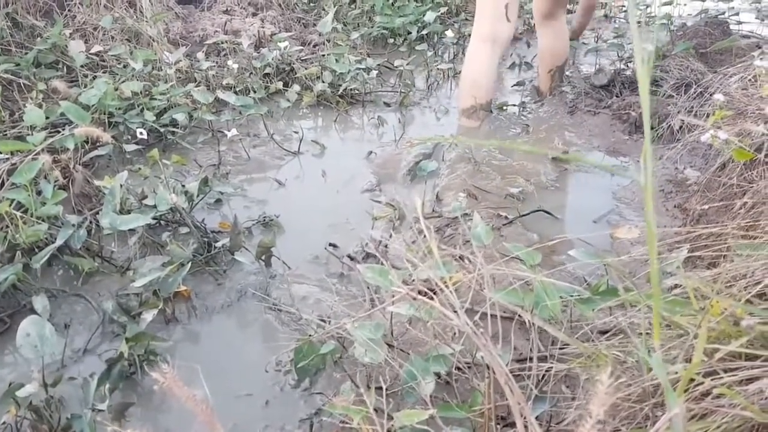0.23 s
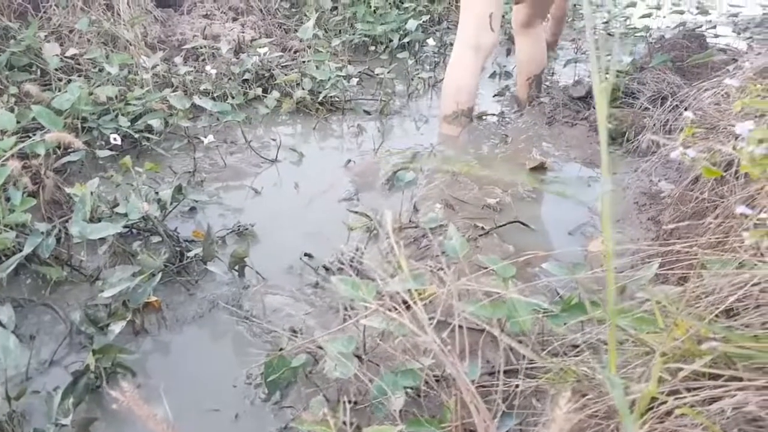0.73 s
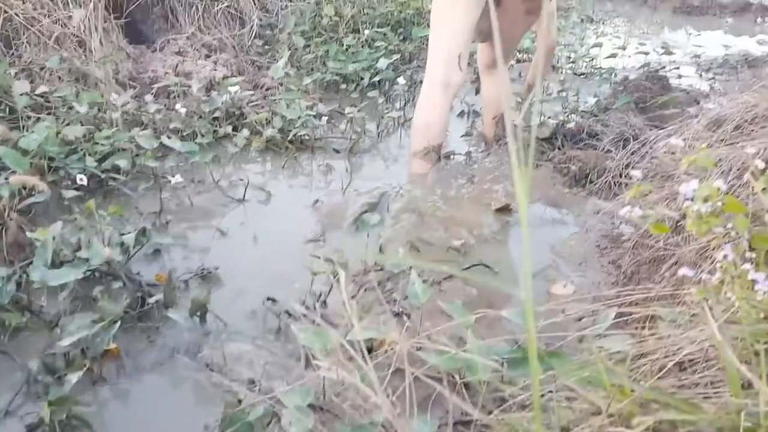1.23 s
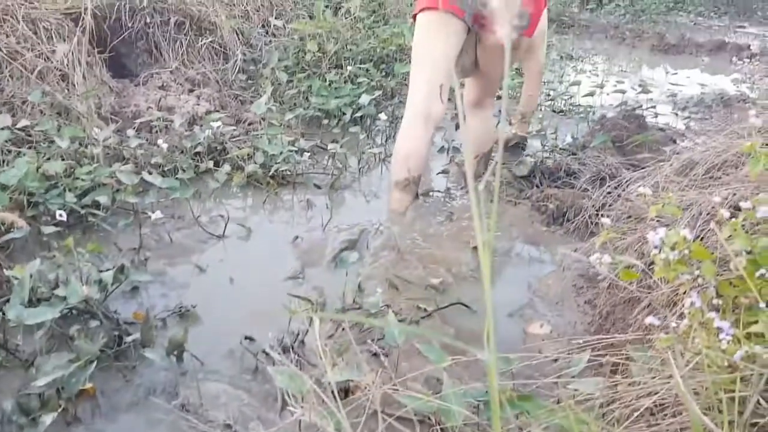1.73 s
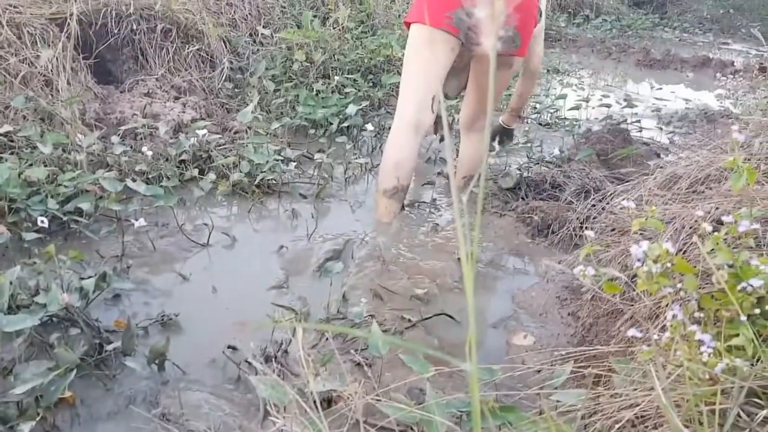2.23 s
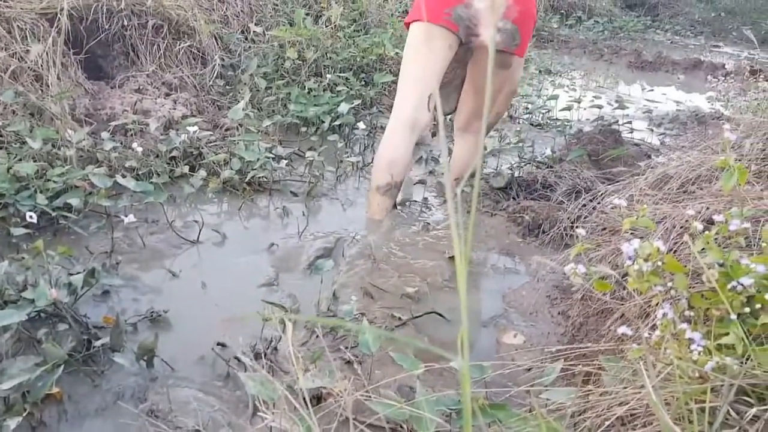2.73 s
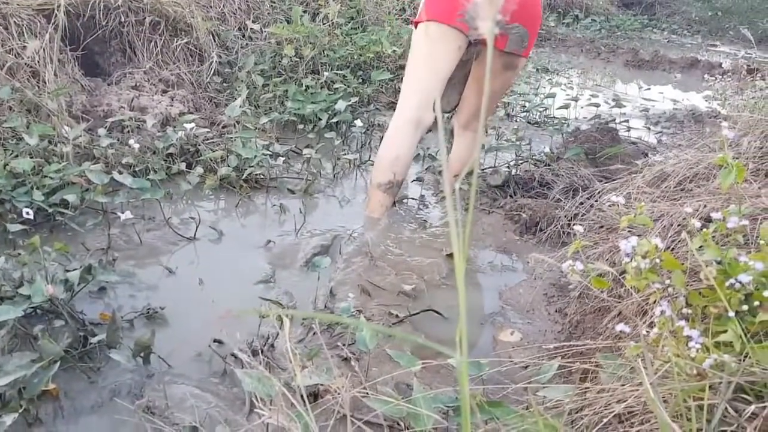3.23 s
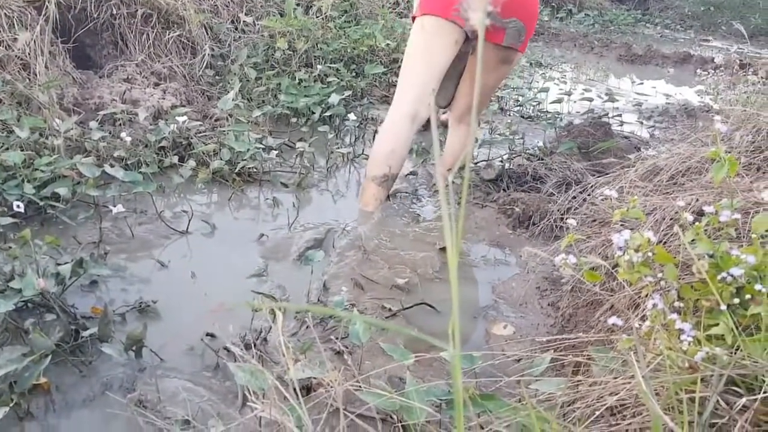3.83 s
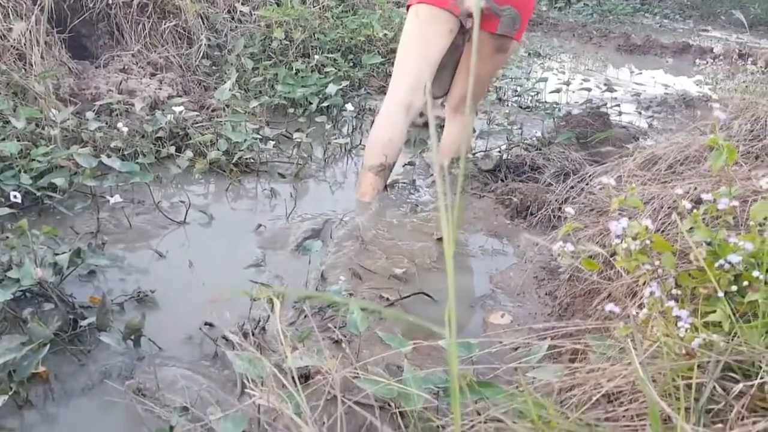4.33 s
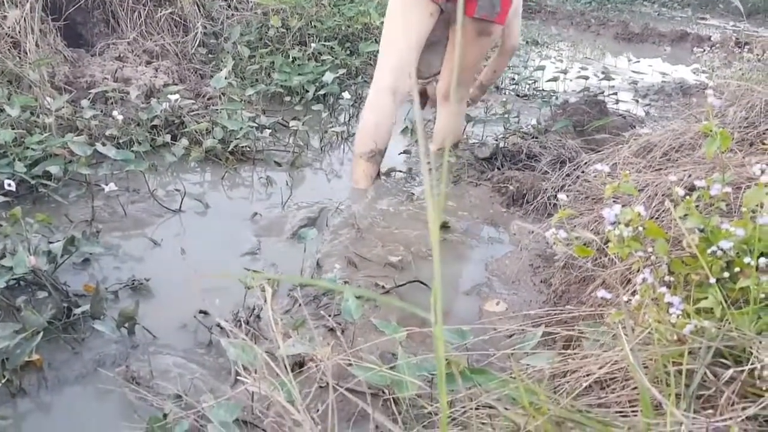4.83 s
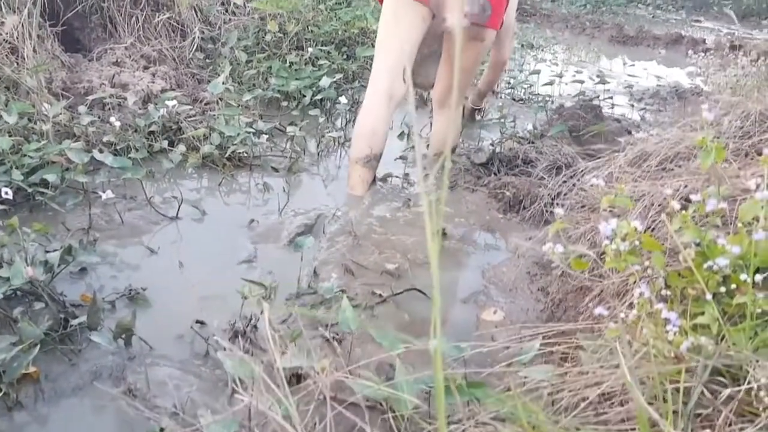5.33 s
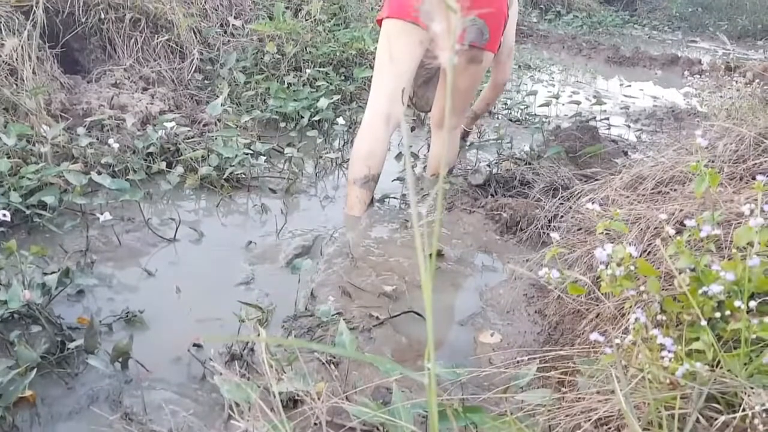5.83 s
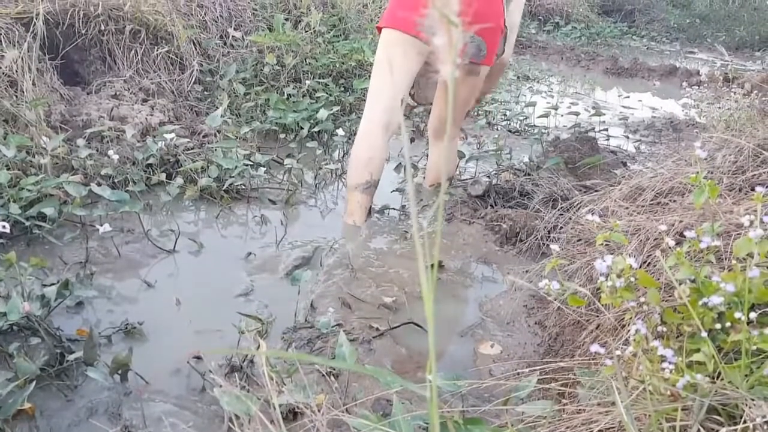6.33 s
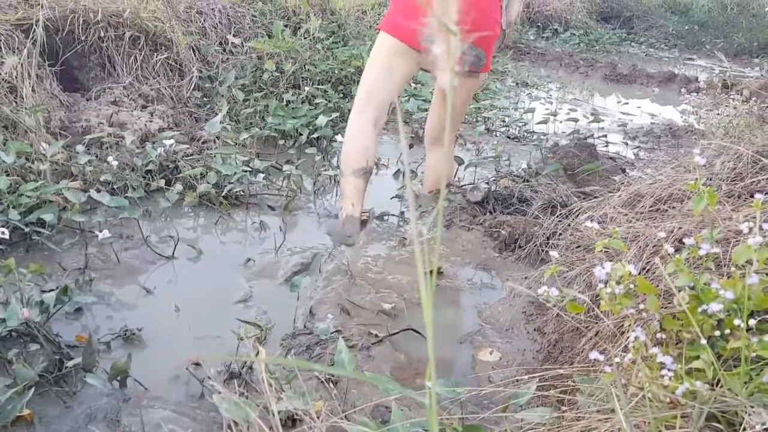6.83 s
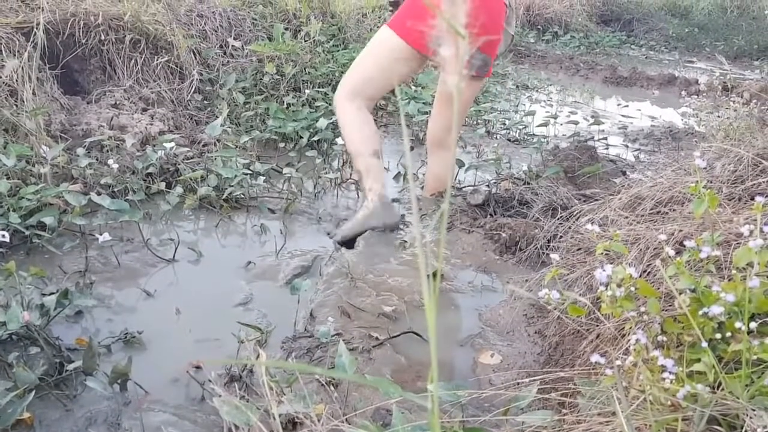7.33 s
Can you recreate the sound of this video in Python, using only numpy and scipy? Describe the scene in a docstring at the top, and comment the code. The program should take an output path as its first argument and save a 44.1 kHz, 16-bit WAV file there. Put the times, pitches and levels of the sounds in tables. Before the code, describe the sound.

Bare feet squelch and plop in shallow muddy water in sparse bursts, while crickets trill over a low distant engine drone outdoors.

```python
"""Mud smacks, trapped air plops, and water sloshes and spatters as someone wades barefoot in a shallow pool.
Three kinds of cricket sing in the grass over a far engine's drone; a light breeze brushes the right microphone.
Water sounds are built from rising bubble notes, smacks from brief rasping rings, and crickets from short
sagging tones; the engine is a wavering note with overtones, and rumble, air and breeze are coloured noise."""
import sys
import numpy as np
from scipy import signal
from scipy.fft import rfft, irfft
from scipy.io import wavfile

SR = 44100
rng = np.random.default_rng(int(sys.argv[2]) if len(sys.argv) > 2 else 0)


def unload_wav(signal):
    """Save mono or channel-first audio to the path in sys.argv[1] as 16-bit WAV at rate SR, clipped to [-1, 1]."""
    wavfile.write(
        sys.argv[1],
        SR,
        np.round(np.clip(np.atleast_2d(signal).T, -1, 1) * 32767).astype(np.int16),
    )


N = 335160
TIME = np.arange(N) / SR
EDGE_HZ = 15750  # upper edge of the whole sound


def gain_of(db):
    """Decibels to amplitude."""
    return 10 ** (np.asarray(db) / 20)


def evened(x):
    """Scales to an rms of one."""
    return x / np.sqrt(np.mean(x ** 2) + 1e-20)


def level(curve):
    """Gain at every sample from rows of (t/s, level/dB)."""
    return gain_of(np.interp(TIME, *np.transpose(curve)))


def read(points, hz):
    """Joins (f/Hz, value) points on a log-frequency axis."""
    f, value = np.transpose(points)
    return np.interp(np.log(hz + 1), np.log(f + 1), value)


def coloured(x, spectrum, power=1):
    """Filters by a (f/Hz, level/dB) spectrum, its decibels multiplied by power."""
    gain = gain_of(power * read(spectrum, np.fft.rfftfreq(N, 1 / SR)))
    return irfft(rfft(x) * gain, N)


def wander(per_s):
    """Slow random drift of unit rms: noise under a Gaussian low-pass."""
    lowpass = np.exp(-(np.fft.rfftfreq(N, 1 / SR) / per_s) ** 2)
    return evened(irfft(rfft(rng.standard_normal(N)) * lowpass, N))


def noise_pair(spectrum, likeness):
    """Coloured noise at both microphones; likeness is the share of power they have in common."""
    shared, *own = rng.standard_normal((3, N))
    pair = np.sqrt(likeness) * shared + np.sqrt(1 - likeness) * np.array(own)
    return evened(coloured(pair, spectrum))


def panned(x, left_db):
    """Makes the left louder than the right by left_db."""
    return x * gain_of([[left_db / 2], [-left_db / 2]])


def add(mix, s, sound):
    """Mixes a sound in at time s, cut off at either end of the scene."""
    start = round(s * SR)
    sound = sound[max(-start, 0):]
    part = mix[max(start, 0):][:len(sound)]
    part += sound[:len(part)]


def outdoors(x, wet_db, t60):
    """Direct sound plus a short scatter off banks and plants, different at each microphone."""
    t = np.arange(SR // 3) / SR
    tail = rng.standard_normal((2, len(t))) * gain_of(-60 * t / t60)
    tail *= t > .0015  # the scatter arrives after the direct sound
    tail /= np.linalg.norm(tail, axis=1, keepdims=True)
    return x + gain_of(wet_db) * signal.fftconvolve(x[None], tail, axes=1)[:, :N]


def ring(hz, t60, octaves_per_s, onset_cycles):
    """A bubble's dying note; it starts softly and its pitch climbs as it nears the surface."""
    t = np.arange(int(np.clip(t60, .002, .2) * SR)) / SR
    pitch = np.minimum(hz * 2 ** (octaves_per_s * t), SR / 2)
    tone = np.sin(2 * np.pi * np.cumsum(pitch) / SR)
    decay = np.exp(-np.log(1000) * t / t60)
    onset = 1 - np.exp(-(t * hz / onset_cycles) ** 2)
    return tone * decay * onset


def rasp(note, hz, cycles):
    """Noise around a note's pitch that follows its loudness; more cycles make a narrower band."""
    band = np.cos(2 * np.pi * hz * np.arange(round(cycles * SR / hz)) / SR)
    noise = signal.fftconvolve(rng.standard_normal(SR // 4), band * np.hanning(len(band)), "same")
    return evened(noise[:len(note)]) * abs(signal.hilbert(note))


def swarm(rows, per_s, cycles, climb):
    """Clouds of small bubbles, each thickening to its loudest moment and thinning out again."""
    size_range_db = 14  # how far the largest bubble stands above the smallest
    out = np.zeros(N)
    for s, swell, fade, db, hz, spread in rows:
        cloud, length = np.zeros(N), swell + fade
        before = swell / length  # share of the bubbles that come before the loudest moment
        for when, size, pitch in rng.random((600, 3))[:int(24 + per_s * length)]:
            rising = when < before
            rarity = when / before if rising else (1 - when) / (1 - before)
            spans = -1.5 * np.log(rarity)  # distance from the loudest moment, in swells or fades
            delay = -swell * spans if rising else fade * spans
            f = hz * 2 ** (spread * np.sqrt(12) * (pitch - .5))  # spread: standard deviation in octaves
            weight = np.exp(-spans / 2) * gain_of(size_range_db * size ** 2) * (f / hz) ** 0.41
            if f < EDGE_HZ:
                add(cloud, s + delay, weight * ring(f, cycles / f, climb * f / cycles, 0.7))
        # equal energy for equal length, whatever the bubbles drawn
        out += gain_of(db) * cloud * np.sqrt(SR * length / 2 / (np.sum(cloud ** 2) + 1e-20))
    return out


def clouds(rows, swell_share, octaves):
    """Gives each movement of the water the same shape: a quick swell, a longer fade and one spread of pitch."""
    return [(s, swell_share * length, (1 - swell_share) * length, db, hz, octaves)
            for s, length, db, hz in rows]


def wing_stroke(hz, length, fall):
    """One sweep of a cricket's scraper along its file: a short tone that sags and fades as the wing slows."""
    u = np.linspace(0, 1, int(length * SR))
    pitch = hz * (1 - fall * (u ** 1.5 - .3))
    turns = rng.random() + np.cumsum(pitch) / SR
    return np.sin(2 * np.pi * turns) * abs(np.sin(np.pi * u ** .75))


def far_engine(hz=75.95, waver_hz=1.522, throb=0.39):
    """A wavering exhaust note with two weak overtones inside a low rumble."""
    # exhaust orders: [multiple of the main note, relative level/dB]
    exhaust_orders = [(1, 0), (1.5, -11), (2, -20)]
    # loudness of the exhaust note: [t/s, level/dB]
    drone_level = [(0, -46.5), (2.5, -47.5), (4.8, -46), (5.8, -48), (7.6, -51.5)]
    # colour of the rumble: [f/Hz, relative level/dB]
    rumble_spectrum = [(18, -52), (28, -26), (40, -5.5), (60, -2), (85, 5), (115, 2), (138, -4.5),
                       (158, -5), (205, -20.5), (258, -19.5), (310, -27), (500, -45), (900, -65.5)]
    # loudness of the rumble: [t/s, level/dB]
    rumble_level = [(0, -47), (1.2, -47), (3, -47), (5.4, -48.5), (6.2, -50.5), (7.6, -48.5)]
    turns = np.cumsum(hz + waver_hz * wander(6.97)) / SR
    note = np.zeros(N)
    for order, db in exhaust_orders:
        note += gain_of(db) * (1 + throb * wander(10)) * np.sin(2 * np.pi * order * turns)
    rumble = noise_pair(rumble_spectrum, likeness=0.95) * level(rumble_level)
    return evened(note) * level(drone_level) + rumble


def breeze(steady_db=-68, swell_share=0.5):
    """The hush of the open field, and eddies that puff mainly on the right microphone."""
    # puffs of breeze: [loudest t/s, length/s, level/dB]
    puffs = [(0.738, 0.072, -53), (.973, 0.0059, -39), (1.046, 0.0098, -41.5), (1.091, 0.085, -47.5),
             (4.141, .013, -40), (5.283, 0.086, -52), (5.372, 0.049, -43), (5.529, 0.027, -47.5)]
    # colour of the eddies: [f/Hz, relative level/dB]
    eddy_spectrum = [(60, -4), (150, 5), (270, -0.5), (380, -6), (500, -12.5), (650, -19), (900, -22),
                     (1500, -34), (4000, -49)]
    # colour of the open air: [f/Hz, relative level/dB]
    air_spectrum = [(200, 4.5), (600, -1), (900, 2.5), (1200, 2), (1600, 3), (2200, 3), (2800, -2),
                    (3800, 0.5), (4700, 4), (5600, -4), (9800, 2.5), (11500, -3.5), (15500, -6)]
    # loudness of the open air: [t/s, level/dB]
    air_level = [(0, -67), (2.2, -65.5), (3.7, -67), (5.5, -67.5), (6.7, -70), (7.6, -60.5)]
    gusts = np.zeros(N)
    for s, length, db in puffs:
        # exponential swell and fade around the loudest moment
        distance = np.maximum((s - TIME) / swell_share, (TIME - s) / (1 - swell_share))
        gusts += gain_of(db) * np.exp(-distance / length)
    steady = gain_of(steady_db + 2.66 * wander(10))
    eddies = noise_pair(eddy_spectrum, likeness=0.33) * (gusts + steady)
    sway = gain_of(.7 * wander(12))
    hush = noise_pair(air_spectrum, likeness=0.082) * level(air_level) * sway
    return hush + eddies * gain_of([[-15], [0]])


def far_insects(trill_hz=7530, trill_db=-76):
    """Many distant crickets merge into a shimmer of noise; one thin trill barely stands out of it."""
    # colour of the merged crickets: [f/Hz, relative level/dB]
    chorus_spectrum = [(5500, -46), (6500, -15.5), (7100, -4), (7450, 2), (7530, 3.5), (7620, -5),
                       (7850, 0), (8050, -12.5), (8800, -7), (9500, -16), (11500, -72)]
    # loudness of the merged crickets: [t/s, level/dB]
    chorus_level = [(0, -64.5), (2, -63.5), (4, -64), (6, -64), (7.6, -64.5)]
    shimmer = gain_of(.8 * wander(25) + 1.2 * wander(200))
    chorus = noise_pair(chorus_spectrum, likeness=0.054) * level(chorus_level) * shimmer
    trill = gain_of(trill_db) * evened(wander(33) * np.sin(2 * np.pi * trill_hz * TIME))
    return panned(chorus + trill, left_db=6.0)


def ground_cricket(hz=8550, rise_hz_per_s=7, strokes_per_s=116, first_end_s=.071):
    """High buzzes of eleven wing strokes that swell and stop short; the pitch creeps up through the scene."""
    # pace: [t/s, buzzes per s]
    buzz_rate = [(0, 7.2), (3.5, 7.2), (5.8, 8), (7.6, 7.554)]
    # loudness: [t/s, level/dB]
    buzz_level = [(0, -64.5), (2.5, -59), (3.5, -57.5), (4.4, -53), (5.4, -50.5), (7.6, -49)]
    out = np.zeros(N)
    buzzes = np.cumsum(np.interp(TIME, *np.transpose(buzz_rate))) / SR
    buzzes -= np.interp(first_end_s, TIME, buzzes)
    for end in np.interp(np.arange(buzzes[-1]), buzzes, TIME):
        # strokes are counted back from the end of the buzz
        for k, (pitch, size) in enumerate(rng.standard_normal((11, 2))):
            f = (hz + rise_hz_per_s * end) * (1 + .005 * pitch)
            stroke = wing_stroke(f, .0068, fall=.065)
            add(out, end - .0095 - k / strokes_per_s, gain_of(size - 6.2 * (k / 10) ** 2) * stroke)
    teeth = 1 + .22 * wander(900)
    left, right = outdoors(out * level(buzz_level) * teeth, wet_db=-12, t60=.06)
    return panned(np.array([np.roll(left, 1), right]), left_db=-2.5)


def answering_cricket(hz=4790, gap_s=.0378, soft_start_db=-7):
    """Longer falling wing strokes in threes, the first one soft, from deep in the grass."""
    # answers: [first stroke t/s, level within this voice/dB]
    answers = [(2.21, -59.5), (3.416, -42), (3.614, -39.5), (3.853, -39.5)]
    out = np.zeros(N)
    for s, db in answers:
        for k in range(3):
            stroke = wing_stroke(hz, 0.0226, fall=0.12)
            add(out, s + k * gap_s - .0105, gain_of(db + soft_start_db * (k == 0)) * stroke)
    rough = 0.2 * out * (1 + 0.37 * wander(450))
    return panned(outdoors(rough, wet_db=9.5, t60=0.047), left_db=1)


def field_cricket(hz=4425, fade_in_db=12, fall=.085, stroke_s=.0112, unsteady=.006):
    """Trills of double wing strokes, about 24 pairs a second; each trill starts soft and flat."""
    # trills: [first pair t/s, last pair t/s, level/dB]
    trills = [(-.077, 0.425, -54.5), (1.122, 1.62, -51), (2.344, 2.856, -50.5), (3.648, 4.327, -50.5),
              (4.895, 5.273, -58), (5.683, 6.147, -56), (7.2, 7.583, -53.5)]
    out = np.zeros(N)
    for first, last, db in trills:
        pairs = round((last - first) / .0422) + 1
        for k, s in enumerate(np.linspace(first, last, pairs)):
            shy = max(1 - k / 2, 0)  # only the first two pairs are held back
            pitch = hz * (1 - .06 * shy + unsteady * rng.standard_normal())
            for offset, length in ((-.0118, stroke_s), (.0012, 1.2 * stroke_s)):
                size, late, sag = rng.standard_normal(3)
                stroke = wing_stroke(pitch, length, fall * (1 + .15 * sag))
                add(out, s + offset + 0.00066 * late, gain_of(db - fade_in_db * shy + size) * stroke)
    # the uneven teeth of the file roughen each stroke
    left, right = outdoors(out * (1 + .24 * wander(500)), wet_db=-12, t60=.15)
    return panned(np.array([left, np.roll(right, 2)]), left_db=12.5)


def stalks(hz=6200):
    """Faint scattered ticks of wet plants and settling mud, each a very short ring."""
    # disturbed wet weeds: [from t/s, to t/s, ticks per s, level of the softest tick/dB]
    rustles = [(0, 7.6, 13, -68.5), (1.3, 2.25, 45, -55.5)]
    out = np.zeros(N)
    for start, end, per_s, db in rustles:
        for when, pitch, size in rng.random((400, 3))[:int(per_s * (end - start))]:
            f = hz * 2 ** (1.2 * (pitch - .5))
            tick = gain_of(db + 11 * size ** 2) * ring(f, 22 / f, 5, 1)
            add(out, start + when * (end - start), tick)
    return panned(outdoors(out, wet_db=1, t60=0.089), left_db=3.0)


def spatters():
    """Fine droplets and tearing mud films: dense clouds of short, high grains."""
    # spatters: [loudest t/s, length/s, level before colouring/dB, middle grain f/Hz]
    spatter_rows = [(.11, 0.053, -66.5, 2670), (.51, .06, -69, 6300), (1.09, 0.052, -69, 3350),
                    (1.79, 0.066, -72.5, 4620), (1.96, 0.039, -71, 5500), (2.06, .09, -69.5, 4030),
                    (2.725, 0.079, -62, 3970), (2.84, 0.15, -67.5, 5340), (3.37, .025, -57, 8500),
                    (3.41, 0.068, -66.5, 3380), (4.63, .12, -64.5, 3350), (7.025, 0.08, -63, 5120),
                    (7.29, 0.075, -61, 2260), (7.39, 0.24, -72, 2970), (7.48, .1, -60, 7000)]
    return swarm(clouds(spatter_rows, swell_share=.35, octaves=0.596), per_s=1100, cycles=21, climb=.2)


def water_bubbles(rows):
    """Moving water heard as clouds of bubble notes that climb as they die."""
    return swarm(clouds(rows, swell_share=.3, octaves=.3), per_s=600, cycles=31, climb=0.2)


def sloshes():
    """Water pushed by a foot or hand, full of small bubbles."""
    # sloshes: [loudest t/s, length/s, level before colouring/dB, middle bubble f/Hz]
    slosh_rows = [(1.11, 0.13, -71.5, 900), (2.06, 0.23, -78, 1460), (3.08, 0.075, -62, 1980),
                  (3.17, 0.037, -65.5, 770), (3.24, .09, -59, 1075), (4.615, .06, -62, 1574),
                  (5.9, 1, -81, 2080), (6.66, 0.057, -69, 1830), (7.01, 0.068, -63, 1100),
                  (7.148, .04, -68, 493), (7.275, 0.071, -57, 850), (7.35, 0.12, -70, 780),
                  (7.46, .16, -64.5, 2340), (7.47, 0.13, -65, 1100)]
    return water_bubbles(slosh_rows)


def plops(climb_octaves=0.4):
    """Trapped air rings at a rising pitch and breaks up into a wake of smaller bubbles."""
    # plops: [t/s, level before colouring/dB, nominal f/Hz, t60/s]
    plop_rows = [(2.778, -35.5, 920, 0.037), (2.789, -38, 1110, 0.017), (2.798, -52, 1640, 0.021),
                 (3.055, -51.5, 1710, .03), (3.079, -54, 1790, .03), (3.207, -40, 1180, 0.018),
                 (3.235, -45, 1637, 0.029), (3.31, -51.5, 955, 0.057), (4.483, -55, 2020, 0.071),
                 (4.541, -49.5, 1970, 0.029), (4.612, -33.5, 1940, 0.014), (6.986, -44, 1337, 0.039),
                 (7.044, -42.5, 1505, .045), (7.234, -43.5, 850, 0.019), (7.267, -50, 710, 0.083),
                 (7.282, -42, 840, 0.037), (7.337, -46, 738, 0.068), (7.412, -50.5, 794, 0.065),
                 (7.519, -40, 934, 0.043), (7.555, -40.5, 914, 0.044), (7.566, -41, 1120, 0.028)]
    wake_delay_s, wake_s, wake_db, wake_pitch_ratio = .012, .03, -24.5, 1.294
    wakes = [(s + wake_delay_s, wake_s, db + wake_db, hz * wake_pitch_ratio) for s, db, hz, _ in plop_rows]
    out = water_bubbles(wakes)
    for s, db, hz, t60 in plop_rows:
        note = ring(hz * .96, t60, climb_octaves / t60, 1.0)
        # thick mud makes the note of an air pocket unsteady
        add(out, s, gain_of(db) * (note + .17 * rasp(note, hz, cycles=3)))
    return out


def smacks(t60=0.01, overtone_ratio=2.2, overtone_db=-14.5):
    """Wet mud snaps apart: a bursting film rings briefly with one overtone, tears with a rasp and throws spray."""
    # smacks: [t/s, relative level/dB, starting f/Hz, spray level before colouring/dB]
    smack_rows = [(.506, -42.5, 6040, -64), (2.055, -41.5, 3580, -77), (2.687, -47, 3340, -53.5),
                  (2.709, -40, 7700, -53), (2.724, -29, 3600, -69), (2.957, -49, 4560, -66),
                  (3.207, -44, 5240, -55.5), (3.36, -33.5, 3090, -50), (3.382, -37, 3350, -61),
                  (4.604, -28.5, 2980, -54), (4.671, -44, 3180, -61.5), (5.663, -50, 5730, -80),
                  (7.023, -44, 6200, -66), (7.061, -56, 5400, -70), (7.136, -39, 4970, -67),
                  (7.277, -34, 1850, -74), (7.448, -44, 4480, -64), (7.511, -44, 5100, -58),
                  (7.571, -30.5, 4130, -54.5)]
    spray_hz, spray_octaves, swell_s, fade_s = 7100, 0.81, .003, .011
    sprays = [(s + swell_s, swell_s, fade_s, db, spray_hz, spray_octaves) for s, _, _, db in smack_rows]
    out = swarm(sprays, per_s=2500, cycles=18, climb=.2)
    for s, db, hz, _ in smack_rows:
        overtone_hz = min(hz * overtone_ratio, EDGE_HZ)
        for f, mode_db in ((hz, 0), (overtone_hz, overtone_db)):
            note = ring(f, t60, 5.5, 1.9)
            add(out, s, gain_of(db + mode_db) * (.5 * note + .28 * rasp(note, f, cycles=4.5)))
    return out


def wading(scatter_db=-4.0):
    """Plops, smacks, sloshing and spatter, all from the same spot in the pool, to the left."""
    # colour of the water sounds; such small air pockets give no bass: [f/Hz, level/dB]
    water_spectrum = [(200, -11), (480, 4.5), (600, 0), (780, 1.5), (1900, 2.5), (2500, 0.5), (3300, 5),
                      (5000, 5), (12000, 9), (15500, 6.5)]
    # tilt towards the left, shared unequally between the sides below: [f/Hz, unscaled tilt/dB]
    pool_side = [(400, 5), (800, 0), (1300, 3.5), (2400, 5.5), (4400, 8.5), (8000, 0.5), (15000, 0)]
    near = sloshes() + spatters() + plops() + smacks()
    left, right = outdoors(coloured(near, water_spectrum), wet_db=scatter_db, t60=.09)
    left = coloured(left, pool_side, 0.28)
    right = coloured(right, pool_side, -0.81)
    return np.array([left, np.roll(right, 1)])  # the right hears it one sample later


def scene():
    """The open field, the insects and the wader."""
    field = far_engine() + breeze()
    insects = far_insects() + ground_cricket() + answering_cricket() + field_cricket()
    return field + insects + stalks() + wading()


def record(dry):
    """Limits the treble with a steep linear-phase low-pass."""
    lowpass = signal.firwin(511, EDGE_HZ, window=("kaiser", 9), fs=SR)
    return signal.oaconvolve(dry, lowpass[None], "same")


dry = scene()
out = record(dry)
unload_wav(out)
```